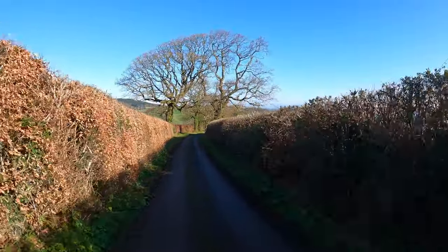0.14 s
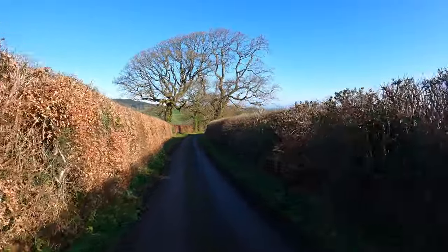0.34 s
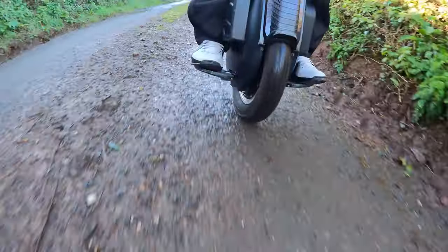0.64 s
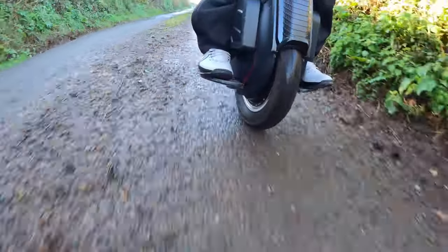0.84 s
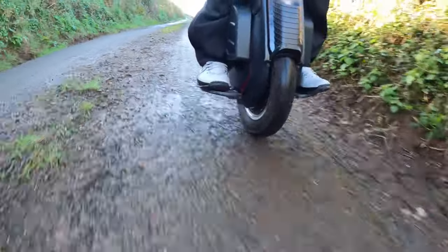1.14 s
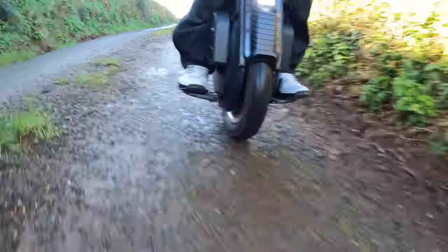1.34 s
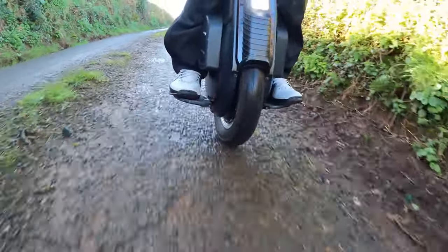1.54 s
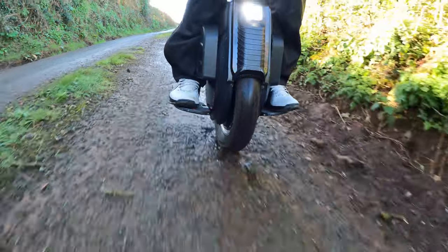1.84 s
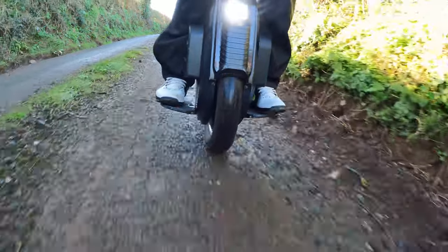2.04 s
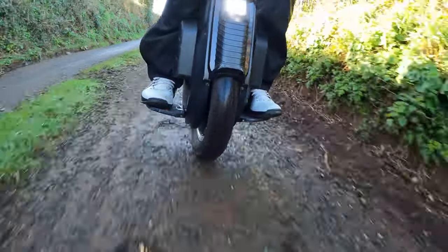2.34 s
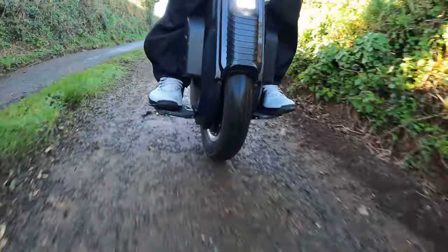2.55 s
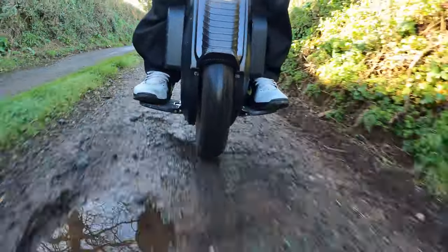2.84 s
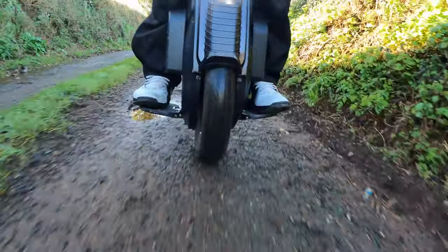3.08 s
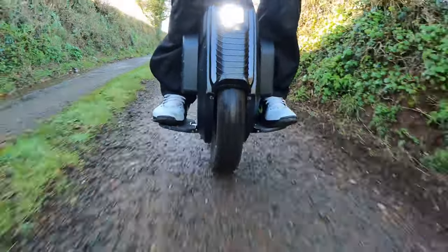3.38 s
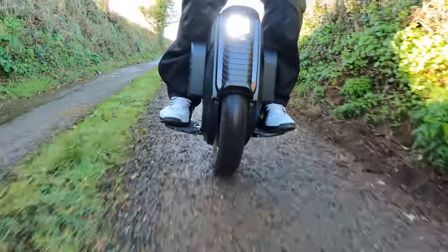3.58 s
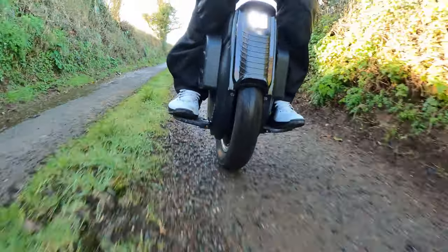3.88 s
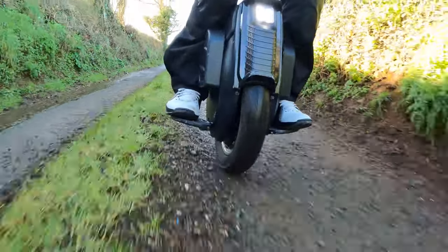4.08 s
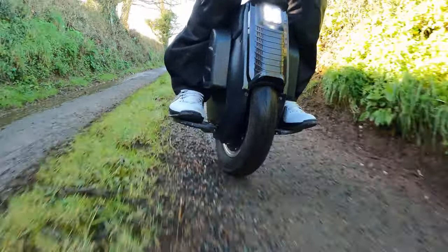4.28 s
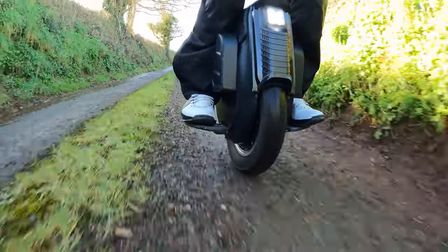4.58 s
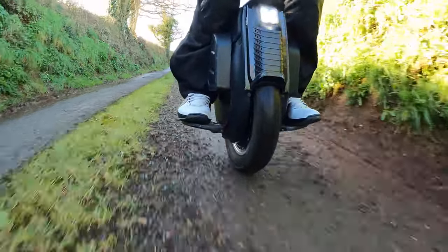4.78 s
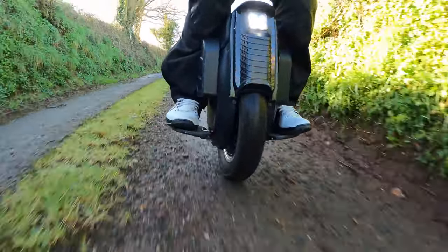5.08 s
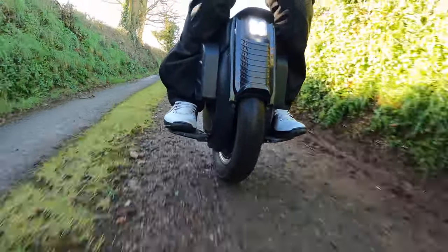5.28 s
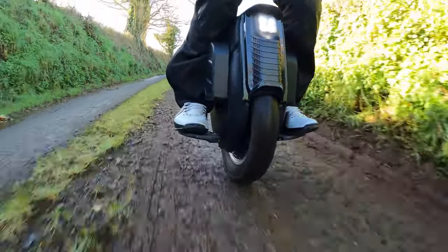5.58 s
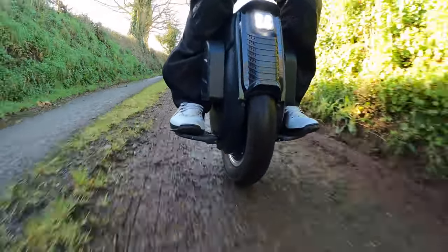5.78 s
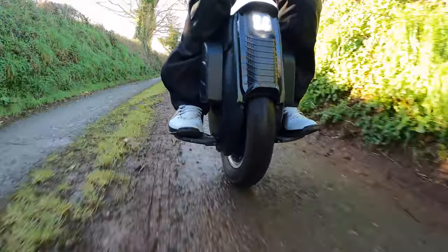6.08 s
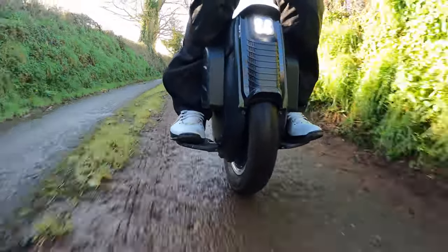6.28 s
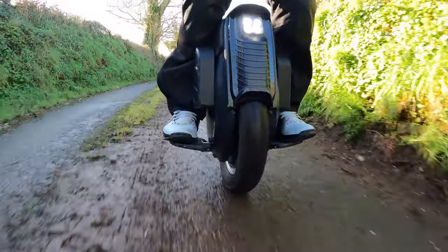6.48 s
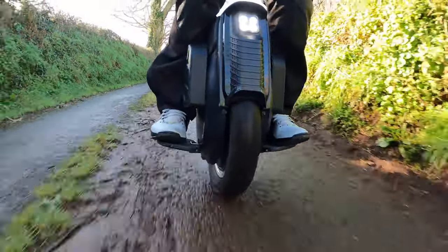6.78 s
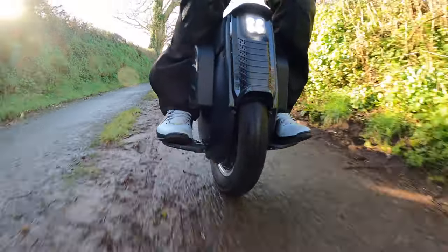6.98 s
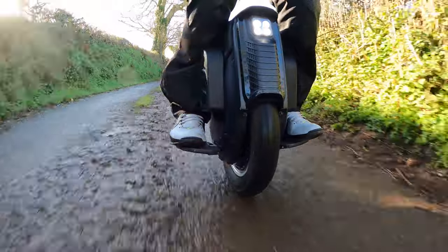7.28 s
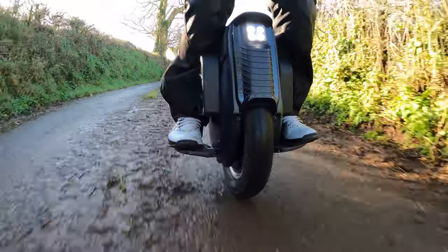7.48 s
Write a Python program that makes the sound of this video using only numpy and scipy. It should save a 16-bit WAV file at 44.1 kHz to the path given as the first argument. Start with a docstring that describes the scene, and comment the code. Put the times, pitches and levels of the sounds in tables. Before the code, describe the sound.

An electric unicycle tyre crunches over wet grit and mud, stones popping sharply above a rough hollow motor drone, low rumble and buffeting wind.

```python
"""A wet, gritty track: an electric unicycle rolls along it, heard from a microphone low ahead of the tyre.
After a moment of smooth asphalt hiss, clumps of filtered grains make the crunch of grit and the wet spray.
Damped knocks and fractures make popping and breaking stones; short tones ping, and fine grains are mud squirts.
Noise-driven resonances make a rough, hollow drone and roar around a hum; low noise is rumble and buffeting wind.
The sound is mono, alike in both channels."""
import sys
import numpy as np
from scipy import signal
from scipy.fft import rfft, irfft, next_fast_len
from scipy.io import wavfile
from scipy.ndimage import uniform_filter1d

SR = 44100
rng = np.random.default_rng(int(sys.argv[2]) if len(sys.argv) > 2 else 0)


def waveform_to_disk(signal):
    """Save audio, clipped to [-1, 1], as 16-bit WAV at the path in sys.argv[1]."""
    frames = np.transpose(np.atleast_2d(signal))
    scaled = np.clip(frames, -1, 1) * 32767
    samples = np.round(scaled).astype(np.int16)
    wavfile.write(sys.argv[1], SR, samples)


N = 336483
TIME = np.arange(N) / SR

# How deep and wet the grit lies, before the layer trims: time_s, crunch_db, spray_db
TRACK = [(.5, -35.5, -48.5), (1.15, -36, -55.5), (1.7, -39, -60), (2.1, -36.5, -51), (2.4, -36, -54),
         (3.05, -38, -49.5), (3.45, -37.5, -47), (3.75, -37, -47.5), (3.95, -38, -47), (4.45, -35.5, -41.5),
         (4.7, -39.5, -46), (5.35, -38.5, -47), (5.9, -35.5, -46.5), (6.35, -37.5, -51), (6.9, -37.5, -49),
         (7.63, -35, -51)]
# Patches of soft mud that muffle the crackle: middle_s, half_length_s, drop_db
MUD = [(1.375, 0.013, 4), (2.743, 0.021, 4), (3.053, 0.011, 6.5), (3.223, 0.03, 10.5), (3.52, 0.019, 0.5),
       (3.745, 0.022, 4), (4.328, 0.022, 5), (4.722, 0.015, 4), (6.23, 0.019, 4), (6.623, 0.027, 4.5),
       (6.88, 0.03, 3)]
# Tone colour of the crunch, the wet spray and the asphalt hiss: frequency_hz, level_db
CRUNCH_SPECTRUM = [(200, -44), (600, 4), (900, 1), (1250, 2.5), (1800, 2.5), (2400, -5), (3600, -13),
                   (5000, -21), (8000, -24.5), (11000, -31.5), (16000, -58)]
SPRAY_SPECTRUM = [(500, -43), (1800, 10), (3000, 5.5), (4000, 3), (5000, -2), (6500, -5), (8500, -10),
                  (10300, -16), (11500, -28.5), (12700, -23), (15500, -36)]
ASPHALT_SPECTRUM = [(500, -18), (750, -6), (1100, 6), (1800, -2.5), (2600, -9.5), (4000, -16),
                    (7000, -26.5), (11000, -37), (16000, -54)]


def tyre(crunch_db=-1.5, spray_db=3.0, crunch_clump_db=1.0, spray_clump_db=3.0,
         crunch_wash=0.69, spray_wash=1.0, pebble_db=-5.5, hiss_db=-49.0):
    """Grit cracks under the tread and wet sand is flung off in the same clumps; pebbles tick between."""
    grit_from_s, edge_s = 0.45, 0.006  # the tyre leaves the asphalt for the grit
    loose = np.clip((TIME - grit_from_s) / edge_s, 0, 1)
    clumps = bursts(per_s=180, decay_s=0.0065)

    grit = grains(per_s=1100, spread_db=4.8, low_hz=800, high_hz=4800, cycles=1.5, count=36)
    crunch = steady(colour(grit + crunch_wash * rng.standard_normal(N), CRUNCH_SPECTRUM), seconds=0.46)
    crunch *= amp(curve(TRACK, column=1) + heaps(column=1) + crunch_db + crunch_clump_db * clumps)

    sand = grains(per_s=5000, spread_db=3, low_hz=2000, high_hz=14000, cycles=2.5, count=28)
    spray = steady(colour(sand + spray_wash * rng.standard_normal(N), SPRAY_SPECTRUM), seconds=0.11)
    pebbles = grains(per_s=70, spread_db=4.2, low_hz=1600, high_hz=6500, cycles=2.6, cap=3, count=20)
    spray *= amp(spray_clump_db * clumps)
    spray += amp(pebble_db) * unit(colour(pebbles, SPRAY_SPECTRUM))
    spray *= amp(curve(TRACK, column=2) + heaps(column=2) + spray_db)

    hiss = amp(hiss_db) * unit(colour(rng.standard_normal(N), ASPHALT_SPECTRUM))
    contact = amp(hops() - humps(MUD))
    return loose * contact * (crunch + spray) + (1 - loose) * hiss


# Loose heaps of gravel that the tyre crushes: middle_s, half_length_s, crunch_lift_db, spray_lift_db
HEAPS = [(1.317, 0.021, -0.5, 8.5), (1.512, 0.12, 3, 7.5), (1.795, 0.071, 3, 6.5), (2.059, 0.045, 4.5, 9),
         (2.535, 0.032, 1.5, 14.5), (2.816, 0.019, 5.5, -2), (2.93, 0.02, 8.5, 0.5),
         (3.14, 0.0086, 8.5, 12), (3.246, 0.073, 4, 14), (3.413, 0.029, 8.5, 4), (3.582, 0.041, 3, 4),
         (3.842, 0.018, 0, 8), (3.94, 0.022, 1, 6.5), (4.124, 0.016, 9, 9.5), (4.218, 0.033, 2, 4.5),
         (4.277, 0.014, -7, 4), (4.383, 0.0059, 6, 6), (4.59, 0.026, 5, 4.5), (4.807, 0.057, 3.5, 0.5),
         (5.026, 0.011, -1, 9), (5.34, 0.063, 3.5, 3.5), (5.813, 0.009, 11, -1), (5.84, 0.03, 1.5, 2.5),
         (6.065, 0.016, -2, -2), (6.287, 0.015, 5, 2), (6.558, 0.047, 5.5, -0.5), (6.681, 0.017, 5, 7),
         (6.82, 0.021, 6, 1), (7.4, 0.043, 2, -2.5), (7.587, 0.035, -8, 4.5)]


def heaps(column):
    """The lift in dB that the heaps of gravel give to the crunch (1) or the spray (2)."""
    return humps((row[0], row[1], row[column + 1]) for row in HEAPS)


# Stones that snap out from under the tyre: start_s, knock_db, pitch_hz, length_cycles,
# tick_db (relative to the knock, before the common tick lift)
STONES = [(0.7976, -24, 1100, 0.54, -25), (1.061, -22, 1680, 0.91, -32), (1.2388, -21, 1600, 1.3, -35),
          (1.4776, -22.5, 1770, 1.1, -25), (1.5248, -17, 1890, 1, -18), (1.5288, -14, 2020, 1.2, -30),
          (1.539, -27, 2700, 1.8, -30), (2.157, -22, 1500, 0.7, -29), (2.0711, -16.5, 1800, 0.32, -18),
          (2.1123, -18, 1210, 0.13, -22), (2.1939, -16.5, 1600, 0.43, -23), (2.791, -18.5, 1560, 0.72, -30),
          (3.135, -19.5, 1540, 1, -26), (3.239, -18, 1900, 0.6, -14), (3.2538, -19, 2110, 0.68, -18),
          (3.256, -18.5, 2300, 0.51, -16), (3.275, -27, 2400, 0.39, -16), (3.302, -19, 1880, 0.91, -25),
          (3.334, -24, 3000, 0.81, -20), (3.4074, -22, 1550, 0.86, -25), (3.646, -25, 1050, 0.91, -27),
          (3.285, -13.5, 2590, 0.77, -25), (3.3177, -7.5, 1920, 0.55, -35), (3.3897, -14, 1930, 0.34, -18),
          (3.668, -8.5, 1960, 0.46, -22.5), (3.8207, -12, 1730, 1.04, -31), (3.823, -9.5, 1600, 0.27, -28),
          (3.8964, -18, 1850, 0.34, -28), (3.94, -18.5, 1860, 0.9, -11), (3.9504, -15, 2100, 0.59, -22),
          (3.993, -20, 1850, 0.81, -26), (4.0152, -20.5, 1840, 0.41, -24), (4.272, -20, 1830, 0.63, -22),
          (4.277, -20, 1770, .7, -20), (4.1257, -7, 1970, 0.53, -28), (4.2154, -20.5, 1570, 0.46, -9),
          (4.2938, -16, 1580, 0.47, -25), (4.3515, -17.5, 1800, 0.55, -18), (4.4346, -13, 1580, 0.25, -22),
          (4.5643, -15.5, 1710, 0.78, -23), (4.568, -19.5, 1600, 0.39, -8), (4.6045, -5, 1500, 0.58, -25),
          (4.778, -19, 1550, 0.25, -10.5), (4.8267, -20.5, 1860, 0.8, -13), (5.0088, -26, 1570, 1.1, -3.5),
          (5.031, -23.5, 1670, 1.2, -11), (5.053, -14.5, 3300, 0.7, -33), (5.075, -21.5, 1640, 0.92, -28),
          (5.104, -21, 1840, 0.57, -21), (5.185, -17, 1820, 0.67, -17), (5.265, -16.5, 1540, 0.34, -20),
          (5.33, -19, 1780, 0.55, -14), (5.402, -22, 1100, 0.64, -25), (5.4997, -20, 940, 0.6, -26),
          (5.5013, -13, 1500, 0.3, -22), (5.5532, -18, 1230, 0.33, -14.5), (5.8047, -14.5, 2160, 0.73, -28),
          (5.83, -13, 2280, 0.62, -28), (5.848, -20, 2200, 0.77, -16), (5.9294, -17.5, 1150, 0.21, -22),
          (6.0668, -17.5, 1600, 0.35, -20), (6.2891, -16.5, 1690, 0.41, -25),
          (6.8152, -19.5, 1220, 0.9, -24), (7.1685, -17.5, 1910, 0.39, -15), (7.282, -21, 1350, 0.72, -38)]


def stones(tick_lift_db=14.0, tick_hz=4050, tick_s=0.00022, scatter_db=-26.5,
           thud_db=-15, thud_hz=750, thud_s=0.00054, lead_s=0.00113):
    """A squeezed stone lets go with a short knock and a bright tick, amid a brief scatter of grit."""
    out = np.zeros(N)
    t = np.arange(-SR // 50, SR // 20) / SR  # zero is the centre of the knock
    crumble = np.exp(-abs(t) / np.where(t < 0, .0015, .004))
    for s, db, hz, cycles, bright_db in STONES:
        age = abs(t) * hz / cycles * np.where(t < 0, 1.2, .7)  # the knock rises faster than it dies
        knock = -np.cos(2 * np.pi * hz * t) * np.exp(-age ** 3.2)
        tick = -np.cos(2 * np.pi * tick_hz * t) * np.exp(-abs(t) / tick_s) * (t >= 0)
        tick *= amp(bright_db + tick_lift_db)
        band = signal.butter(1, [min(hz, tick_hz / 2), tick_hz], "band", fs=SR)
        scatter = amp(scatter_db) * crumble * unit(signal.lfilter(*band, rng.standard_normal(len(t))))
        # the bigger the stone, the more the tread itself thuds
        thud = -2 * amp(thud_db + db / 2) * np.cos(2 * np.pi * thud_hz * t) * np.exp(-(t / thud_s) ** 2)
        pop = knock + tick + thud + scatter + skitter(t, hz)
        add(out, s + lead_s + t[0], amp(db) * pop)
    return colour(out, [(150, 3), (600, -1.0), (6500, 2.5), (10000, -9.0), (12000, -16), (16000, -25)])


def skitter(t, hz, ring_db=-22.0, ring_s=0.0015, chip_db=-13.0, chip_s=0.0003,
            spread_s=0.009, fade_s=0.005, count=4):
    """After the knock a stone rings at its own pitch and jostles a few neighbours, later ones more weakly."""
    out = amp(ring_db) * -np.cos(2 * np.pi * hz * t) * np.exp(-abs(t) / ring_s) * (t > 0)
    for when, size in rng.random((count, 2)):
        delay = when * spread_s
        chip_hz = hz * (0.87 + 1.7 * size)
        fade = np.exp(-delay / fade_s - abs(t - delay) / chip_s)
        out += amp(chip_db) * fade * np.sin(2 * np.pi * chip_hz * (t - delay))
    return out


def hops(from_db=-8.5, db_per_db=3, after_s=0.029, half_s=0.029):
    """A big stone kicks the tyre up, so ground contact briefly drops (in dB), more after a harder knock."""
    return -humps((s + after_s, half_s, db_per_db * max(db - from_db, 0)) for s, db, *_ in STONES)


# Soft stones that crumble under the tread: start_s, level_db (before the trim), body_hz, decay_s
CRUSHES = [(1.5306, -29.5, 2400, 0.0092), (2.067, -32, 2900, .005), (2.1973, -29, 1900, 0.0045),
           (3.319, -22, 2200, .004), (3.389, -27, 3400, 0.0073), (3.662, -30, 2800, 0.0044),
           (3.6695, -23, 2000, .004), (3.824, -27, 1700, .005), (3.896, -17.5, 1930, 0.0045),
           (3.923, -21.5, 3700, .004), (4.1275, -23, 1900, .005), (4.231, -32, 3300, .005),
           (4.288, -21, 1700, .005), (4.294, -19, 1300, .005), (4.383, -26, 2000, .005),
           (4.393, -21, 1700, 0.0036), (4.4378, -22.5, 2600, 0.0076), (4.597, -22, 1910, 0.0098),
           (4.826, -25, 3000, 0.0055), (5.806, -27, 2400, .007), (5.830, -24, 2500, 0.0044),
           (6.288, -20.5, 3550, 0.0033), (6.682, -21, 3270, 0.0024), (6.700, -26, 2400, .004),
           (6.816, -25, 1300, .005), (6.824, -25, 1400, .008), (6.842, -29, 2100, 0.0036)]


def crushes(trim_db=-1.5, rise_s=0.00041, body_db=-7.0, width=0.17):
    """A stone breaks in a quick run of small fractures, each ringing the stone's own body."""
    out, t = np.zeros(N), np.arange(SR // 12) / SR
    for s, db, hz, decay in CRUSHES:
        fractures = rng.standard_normal(len(t)) * (rng.random(len(t)) < 4000 / SR)  # 4000 a second
        band = signal.butter(2, [hz / 2, hz * 1.12], "band", fs=SR)
        crack = signal.lfilter(*band, fractures)
        body = signal.lfilter(*signal.iirpeak(hz, 1 / width, SR), fractures)
        crumbling = steady(unit(crack) + amp(body_db) * unit(body), seconds=0.0076)
        envelope = (1 - np.exp(-t / rise_s)) * np.exp(-t / decay)
        add(out, s, amp(db + trim_db) * crumbling * envelope)
    return out


# Small flung chips that ping off the wheel's shell: start_s, level_db (before the trim), pitch_hz
PINGS = [(0.98, -21.5, 3860), (1.4765, -25, 4300), (1.7755, -21.5, 4900), (2.2244, -24, 4080),
         (2.363, -29, 4800), (6.6238, -24, 5270), (6.939, -20, 4730), (7.0143, -22, 4130)]


def pings(trim_db=-2, rise_s=0.00038, decay_s=0.00059):
    """Each chip rings very briefly in two close modes."""
    out, t = np.zeros(N), np.arange(SR // 50) / SR
    envelope = (1 - np.exp(-t / rise_s)) * np.exp(-t / decay_s)
    for s, db, hz in PINGS:
        ring = np.sin(2 * np.pi * hz * t) + 0.67 * np.sin(2 * np.pi * 1.14 * hz * t)
        add(out, s, 2 * amp(db + trim_db) * ring * envelope)
    return out


# Squirts of wet mud: start_s, level_db (before the trim), decay_s
SQUIRTS = [(0.901, -28.5, 0.025), (1.8412, -32, 0.025), (1.865, -25, 0.0041), (1.9906, -21, 0.0056),
           (2.0323, -26, 0.025), (2.067, -15.5, 0.0061), (2.189, -30, 0.027), (2.31, -29.5, 0.0059),
           (2.501, -43, 0.012), (2.5584, -26, 0.0075), (3.2405, -23, 0.013), (3.256, -30, 0.018),
           (3.479, -21, 0.0092), (4.108, -16, 0.0051), (4.28, -21.5, 0.03), (6.065, -27.5, 0.033),
           (6.6794, -38, 0.04), (6.8095, -22, 0.013)]
# Tone colour of the fizzing drops: frequency_hz, level_db
SQUIRT_SPECTRUM = [(500, -30), (2000, 12.5), (4000, 7), (6500, 4), (9500, -6), (11500, -18.5), (13000, -18),
                   (16000, -32)]


def squirts(trim_db=-9, rise_s=0.00095):
    """Wet mud pressed out sideways bursts into fine fizzing drops."""
    swell, t = np.zeros(N), np.arange(SR // 4) / SR
    for s, db, decay in SQUIRTS:
        add(swell, s, amp(db + trim_db) * (1 - np.exp(-t / rise_s)) * np.exp(-t / decay))
    drops = grains(per_s=8100, spread_db=18.0, low_hz=1910, high_hz=15400, cycles=1.0)
    return swell * unit(colour(drops, SQUIRT_SPECTRUM))


# Hollow resonances of the drone, then of the road roar: frequency_hz, width_hz, level_db
DRONE_MODES = [(204.9, 21, -1), (232.7, 21, 0), (257.4, 10, -2), (281.2, 13, -8.5)]
ROAR_MODES = [(353, 161, 5), (460.5, 78, 4.5), (622, 30, -11), (812.3, 40, -4), (1073, 132, -3)]
# Course of the drone's pitch; its relative sway is softened below: time_s, pitch_hz
DRONE_PITCH = [(0, 238.7), (.8, 233.7), (1.6, 233.9), (2.1, 241.4), (3.1, 242.7), (3.6, 236), (4.1, 250.5),
               (5.0, 247.1), (5.5, 231.2), (6.0, 238.8), (6.5, 233.5), (7.0, 237.2), (7.63, 230.6)]


def drone(drone_db=-28.5, roar_db=-36, sway=0.341):
    """The running wheel shakes hollow resonances: a throbbing, swaying drone and a weaker roar above it."""
    pitch = curve(DRONE_PITCH, column=1)
    place = np.cumsum((pitch / pitch.mean()) ** sway)  # reading position: faster is higher
    swaying = np.interp(place, np.arange(N), ringing(DRONE_MODES), period=N)
    throb = steady(swaying, seconds=0.27)
    throb *= amp(drone_db - 8 * smoothness() + jolts(column=1))
    roar = steady(ringing(ROAR_MODES), seconds=0.98)
    roar *= amp(roar_db - 10.5 * smoothness() + jolts(column=2) + hops())
    return throb + roar


def hum(hum_db=-35.0, hum_hz=244.54, width_hz=6.2):
    """The wheel's narrow, slowly beating tone, which grows with the roughness of the ground."""
    tone = steady(ringing([(hum_hz, width_hz, 0)]), seconds=0.14)
    return amp(hum_db - 8 * smoothness()) * tone


def smoothness(rough_by_s=0.63):
    """Smoothness of the ground, falling from 1 at the start to 0 when fully rough."""
    return np.clip(1 - TIME / rough_by_s, 0, 1)


# Bumps that jolt the wheel: middle_s, drone_lift_db, roar_lift_db, rumble_lift_db
BUMPS = [(1.07, 3, 0.5, 0), (2.17, 0.5, 4, -11), (2.47, 4.5, 4, 9), (3.12, 1, 4.5, -6),
         (3.46, 1.5, 2.5, 9.5), (4.1, 2.5, 1, 4), (4.28, 3, 4, 5), (5.33, 4, 2.5, -1), (5.5, 3, 2, 1.5),
         (5.85, 6.5, 4, -6), (6.56, 7.5, 0.5, 4), (6.82, 1.5, 3, 2.5), (7.22, -8.5, -1.5, 12.5),
         (7.47, 0, -0.5, 10)]


def jolts(column, half_s=0.063):
    """The lift in dB that the bumps give to the drone (1), roar (2) or rumble (3)."""
    return humps((row[0], half_s, row[column]) for row in BUMPS)


# The unevenness of the ground: time_s, rumble_db
GROUND = [(0, -44), (.6, -38.5), (1.3, -33.5), (1.75, -39), (2.1, -32.5), (2.9, -35.5), (4.3, -47),
          (4.6, -31), (5.15, -35), (6.3, -28.5), (6.9, -35.5), (7.63, -40)]
# Tone colour of the rumble: frequency_hz, level_db
RUMBLE_SPECTRUM = [(30, -27), (65, -12), (85, -7.5), (122, -6), (152, -9.5), (200, -20), (330, -18),
                   (700, -53), (16000, -140)]


def rumble():
    """Uneven ground shakes up low noise, its level following the ground and the bumps."""
    low = steady(colour(rng.standard_normal(N), RUMBLE_SPECTRUM), seconds=0.37)
    return amp(curve(GROUND, column=1) + jolts(column=3)) * low


# The airflow at the microphone, before the trim: time_s, buffet_db
GUSTS = [(0, -38), (.55, -32.5), (.78, -35.5), (.97, -26.5), (1.5, -26.5), (1.75, -34.5), (2.05, -20.5),
         (2.5, -27.5), (2.8, -30.5), (3.1, -29.5), (3.35, -39), (3.47, -30), (3.85, -39), (4.4, -32.5),
         (4.56, -25.5), (4.8, -28.5), (5.3, -27.5), (5.9, -28.5), (7.2, -31.5), (7.35, -24), (7.63, -31)]
# Tone colour of the wind: frequency_hz, level_db
WIND_SPECTRUM = [(5, -20), (15, -5.5), (28, -0.5), (50, -0.5), (66, 1.5), (85, -6), (160, -25), (700, -60),
                 (16000, -140)]


def wind(trim_db=1.5):
    """Air buffets the microphone as lumpy low noise that follows the gusts."""
    buffet = steady(colour(rng.standard_normal(N), WIND_SPECTRUM), seconds=0.24)
    return amp(curve(GUSTS, column=1) + trim_db) * buffet


def ringing(modes):
    """Random shaking rings each (frequency_hz, width_hz, level_db) resonance."""
    out = np.zeros(N)
    for hz, width, db in modes:
        # two passes of a filter pi/2 times as wide leave about this width
        b, a = signal.iirpeak(hz, hz / (width * np.pi / 2), SR)
        once = signal.lfilter(b, a, rng.standard_normal(N))
        out += amp(db) * unit(signal.lfilter(b, a, once))
    return out


def grains(per_s, spread_db, low_hz, high_hz, cycles, cap=1.73, count=24):
    """A hail of tiny damped ticks of many pitches, with random sizes up to a cap."""
    chance, kind = rng.random(N), rng.integers(0, count, N)
    sizes = amp(spread_db * np.minimum(rng.exponential(1, N), cap)) * rng.choice([-1, 1], N)
    hits, out = sizes * (chance < per_s / SR), np.zeros(N)
    for k, hz in enumerate(np.geomspace(low_hz, high_hz, count)):
        r, turn = np.exp(-hz / (cycles * SR)), 2 * np.pi * hz / SR
        resonator = [1, -2 * r * np.cos(turn), r * r]
        out += (1 - r) * signal.lfilter([1, 0, -1], resonator, hits * (kind == k))
    return unit(out)


def bursts(per_s, decay_s):
    """Random sudden swells that die away, with mean 0 and rms 1."""
    kicks = 1.0 * (rng.random(N) < per_s / SR)
    swells = np.sqrt(signal.lfilter([1], [1, -np.exp(-1 / (decay_s * SR))], kicks))
    return unit(swells - swells.mean())


def humps(rows):
    """Sums smooth rises and falls, each given as (middle_s, half_length_s, height_db)."""
    t = TIME[::32]  # coarse grid, joined by straight lines
    total = sum(db * np.exp(-((t - s) / half_s) ** 2) for s, half_s, db in rows)
    return np.interp(TIME, t, total)


def amp(db):
    """Decibels to gain."""
    return 10 ** (np.asarray(db) / 20)


def unit(x):
    """Scales to rms 1."""
    return x / np.sqrt(np.mean(x ** 2) + 1e-20)


def curve(rows, column):
    """One column of a table, joined by straight lines in time."""
    rows = np.asarray(rows)
    return np.interp(TIME, rows[:, 0], rows[:, column])


def colour(x, spectrum):
    """Filters by a (frequency_hz, level_db) spectrum."""
    hz, db = np.transpose(spectrum)
    size = next_fast_len(N)
    bins = np.fft.rfftfreq(size, 1 / SR)
    gain = amp(np.interp(np.log(bins + 1), np.log(hz), db))
    return irfft(rfft(x, size) * gain, size)[:N]


def steady(x, seconds):
    """Evens the rms to about 1 over stretches of this length; quicker flutter stays."""
    size = max(int(seconds * SR), 2)
    power = uniform_filter1d(uniform_filter1d(x ** 2, size), size)
    return x / np.sqrt(abs(power) + 1e-12)


def add(mix, s, sound):
    """Mixes a sound in at time s, in seconds."""
    part = mix[max(round(s * SR), 0):][:len(sound)]
    part += sound[:len(part)]


def scene():
    """Everything reaches both channels alike."""
    ground = tyre() + stones() + crushes() + pings() + squirts()
    mono = ground + drone() + hum() + rumble() + wind()
    return np.tile(mono, (2, 1))


def record(dry):
    """The recorder's band limit, a steep low-pass at 15750 Hz."""
    low_pass = signal.firwin(511, 15750, window=("kaiser", 9), fs=SR)
    return signal.oaconvolve(dry, low_pass[None], "same")


dry = scene()
out = record(dry)
waveform_to_disk(out)
```